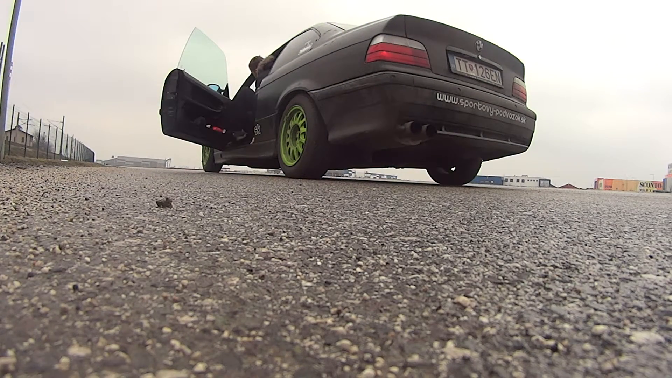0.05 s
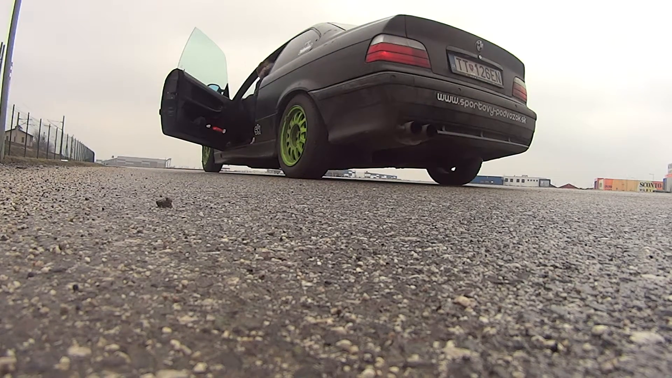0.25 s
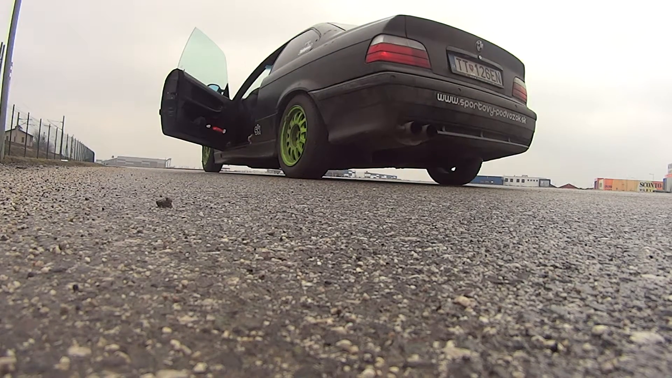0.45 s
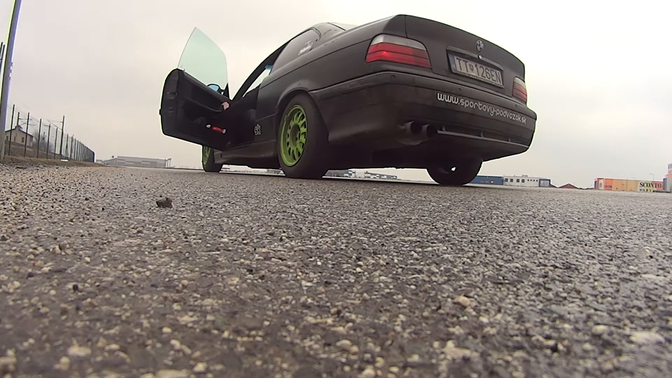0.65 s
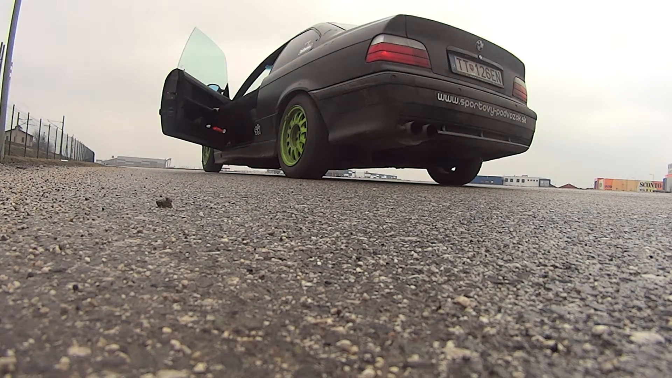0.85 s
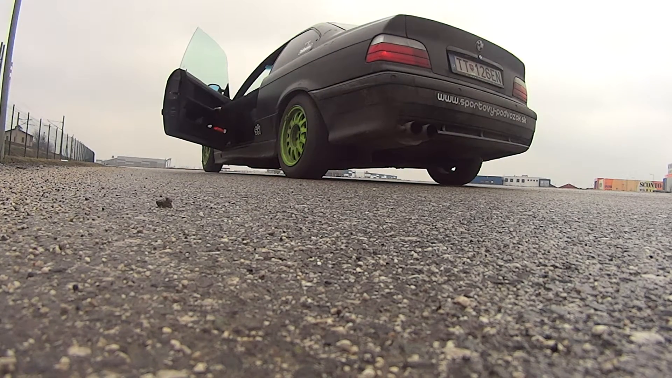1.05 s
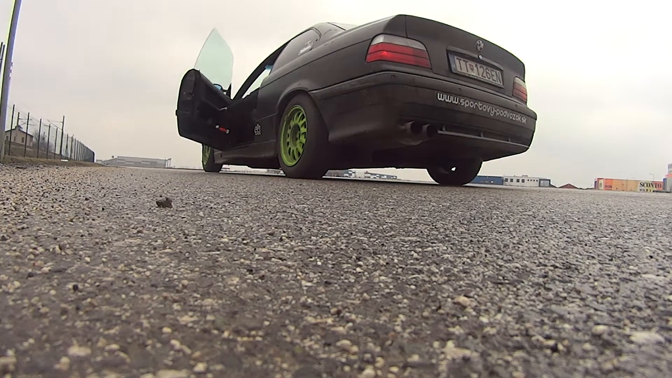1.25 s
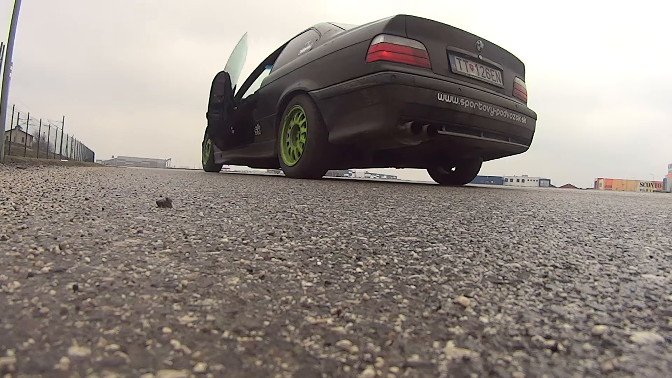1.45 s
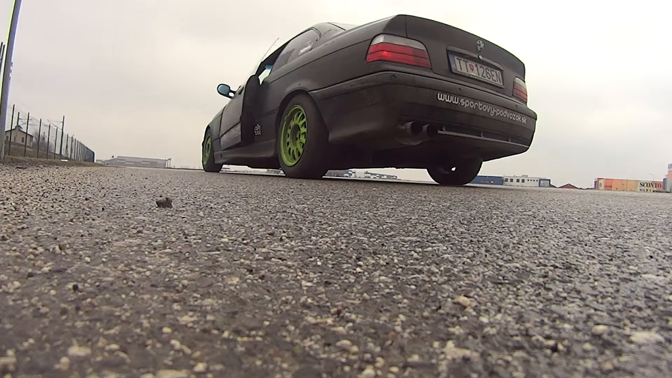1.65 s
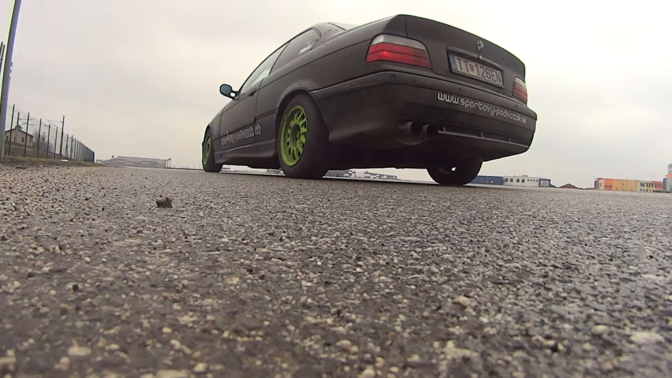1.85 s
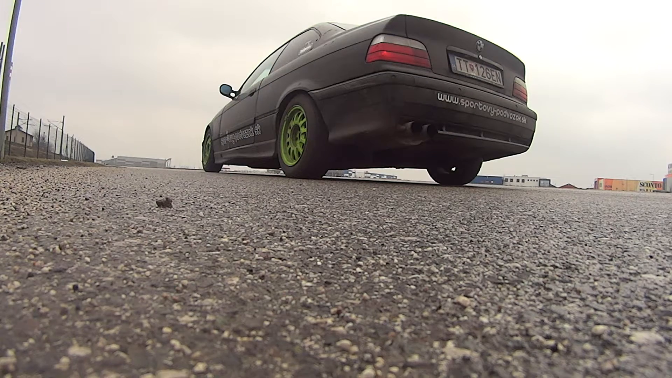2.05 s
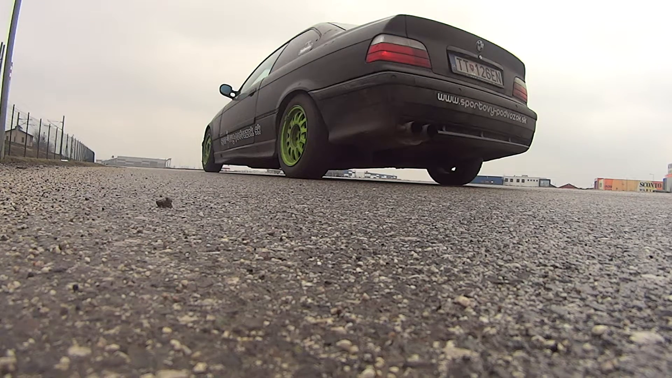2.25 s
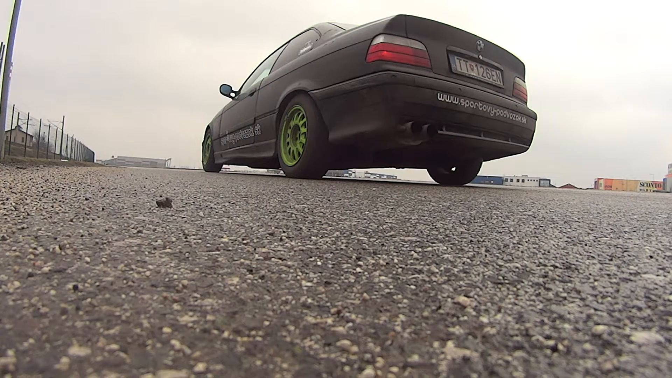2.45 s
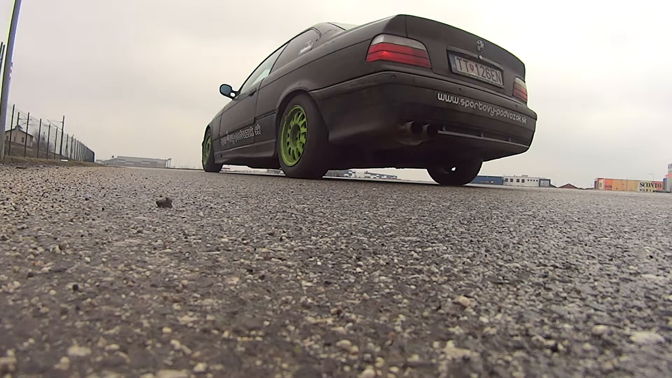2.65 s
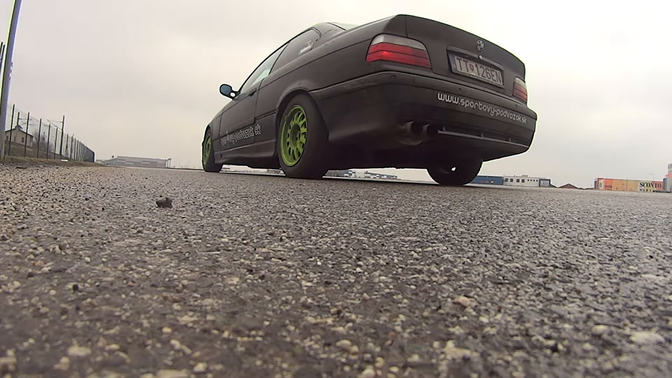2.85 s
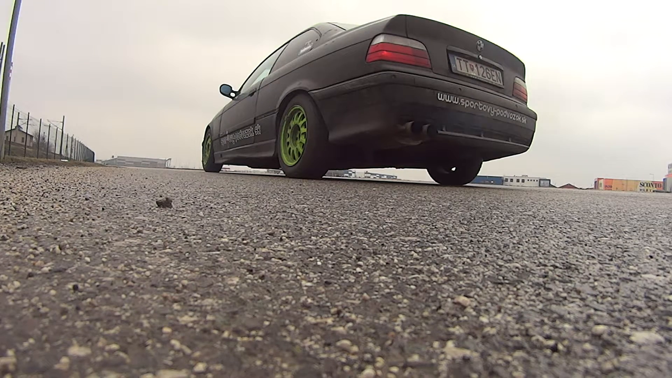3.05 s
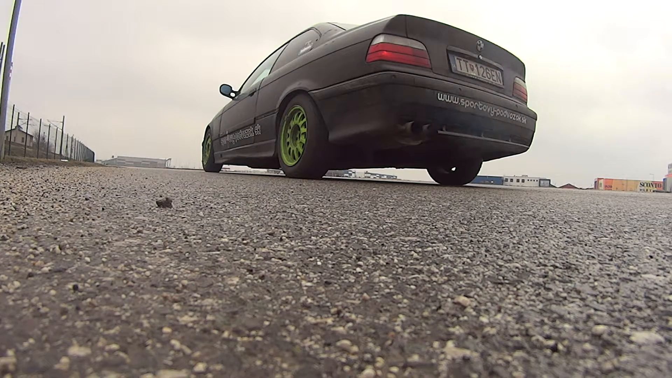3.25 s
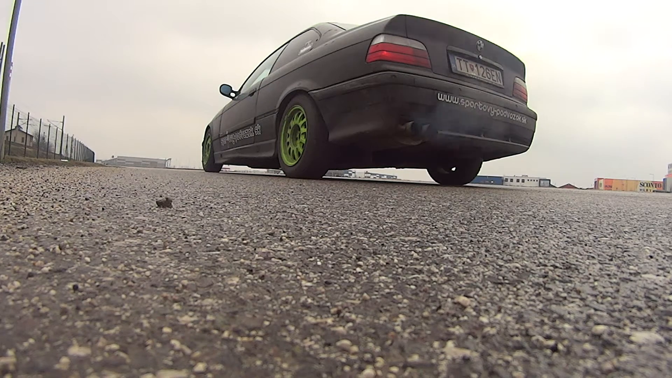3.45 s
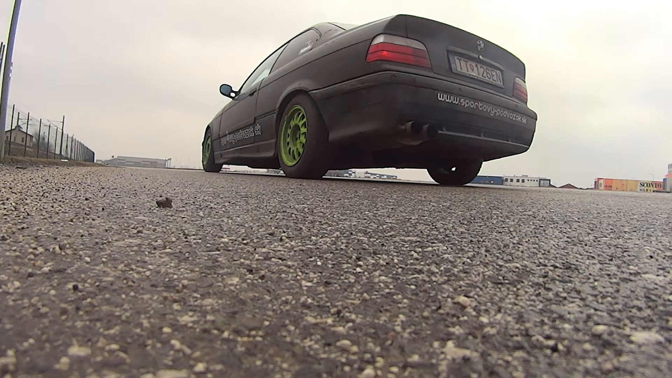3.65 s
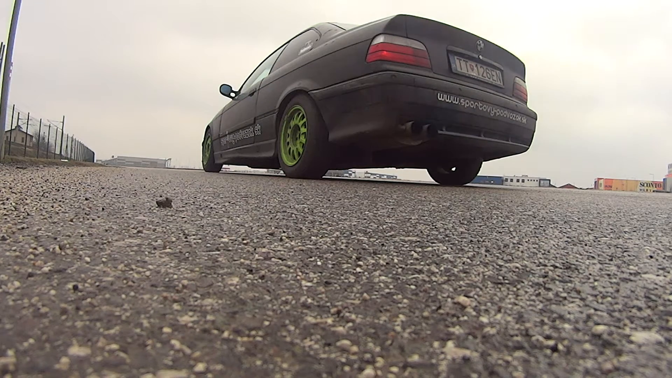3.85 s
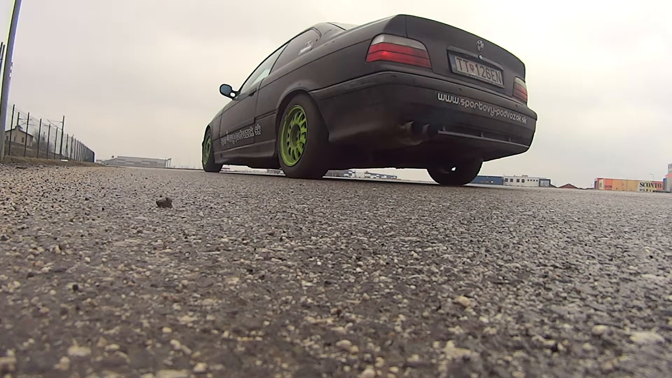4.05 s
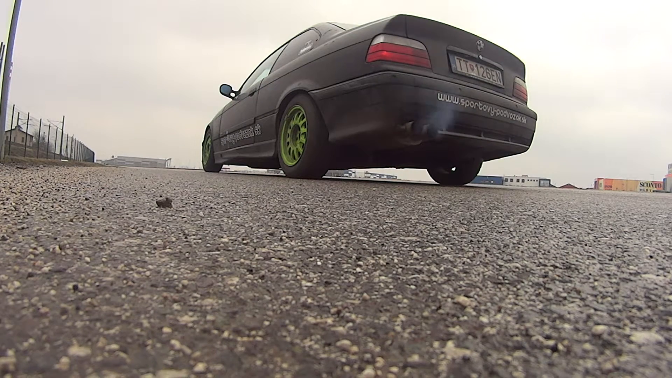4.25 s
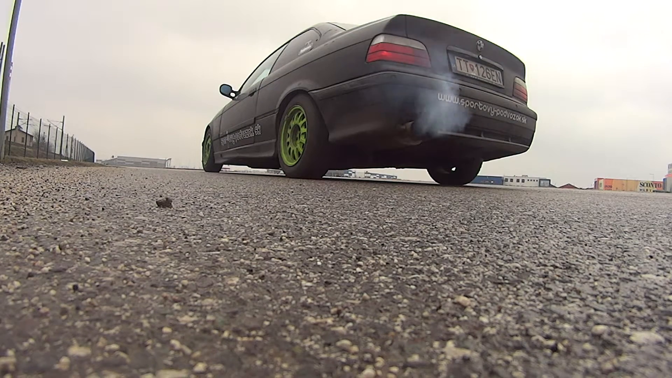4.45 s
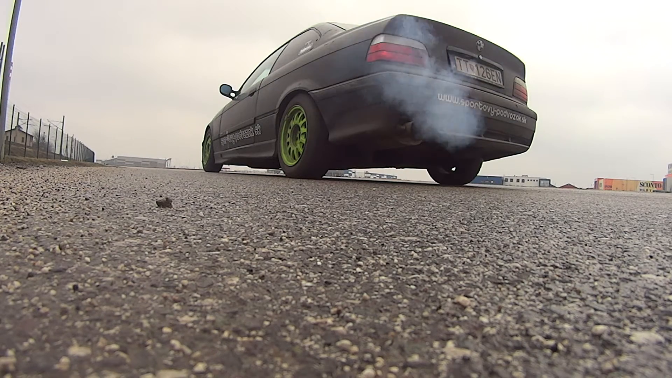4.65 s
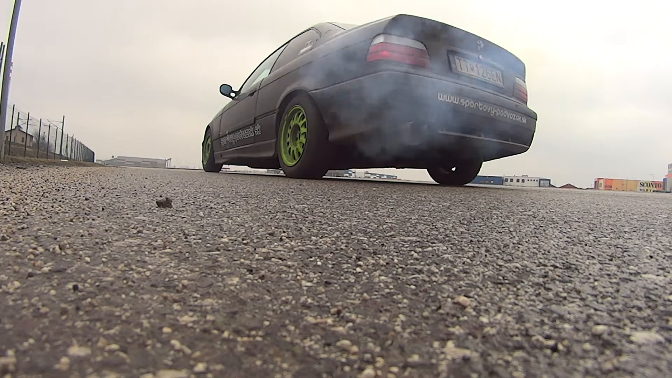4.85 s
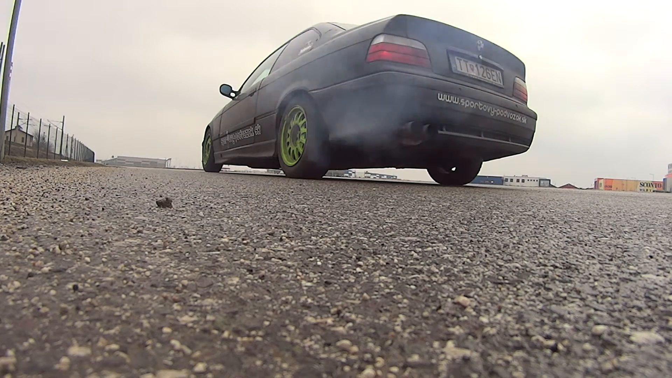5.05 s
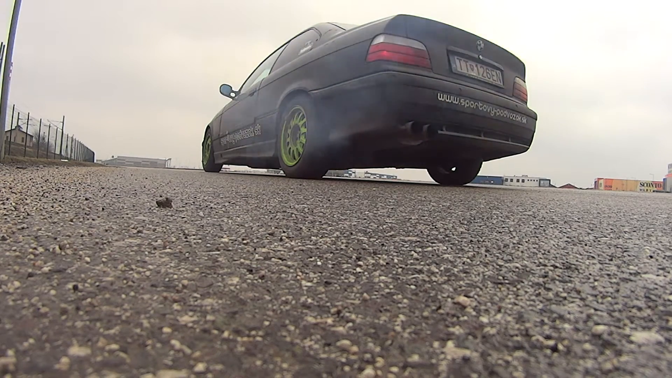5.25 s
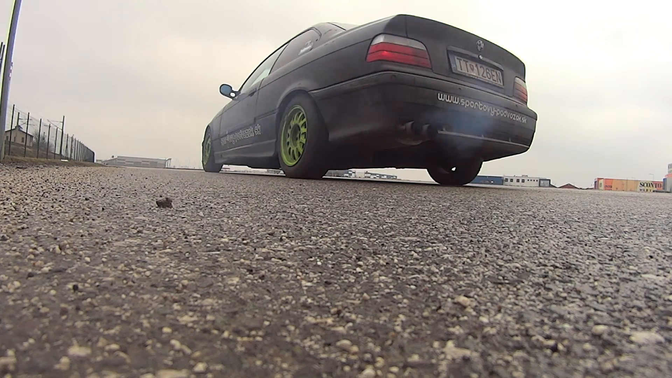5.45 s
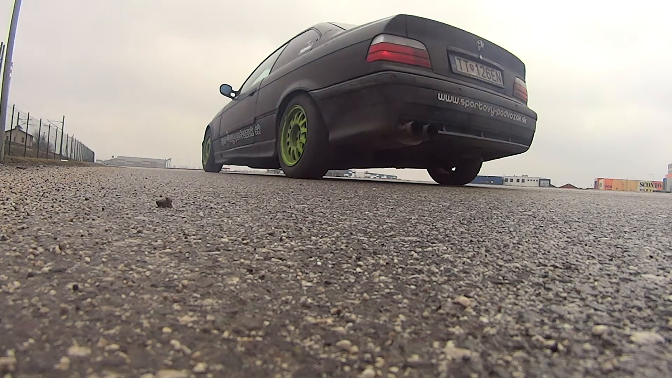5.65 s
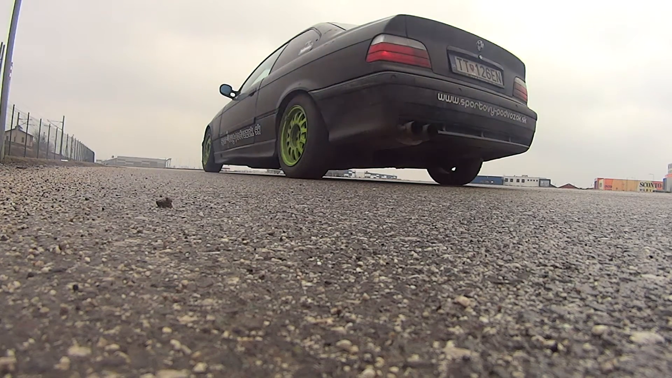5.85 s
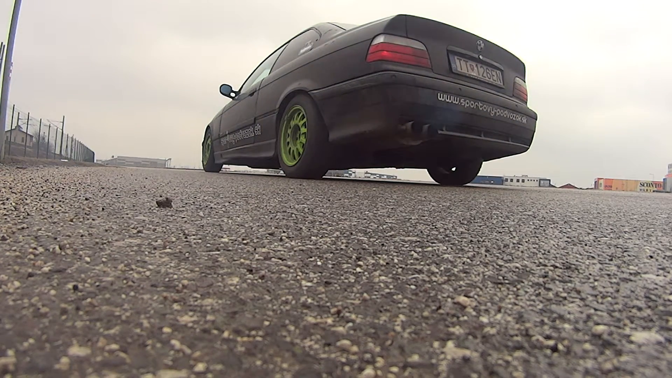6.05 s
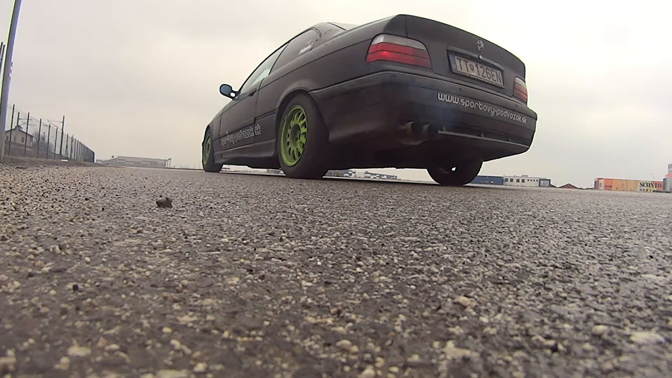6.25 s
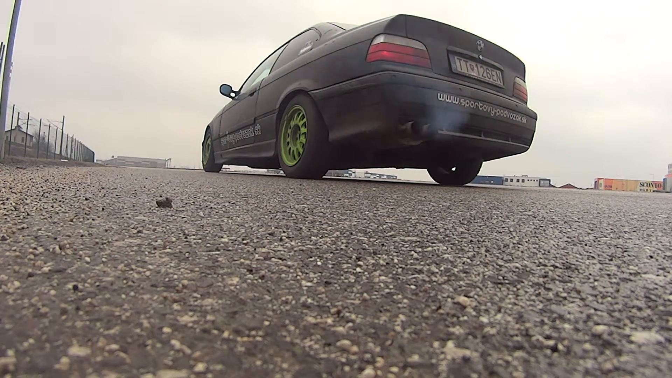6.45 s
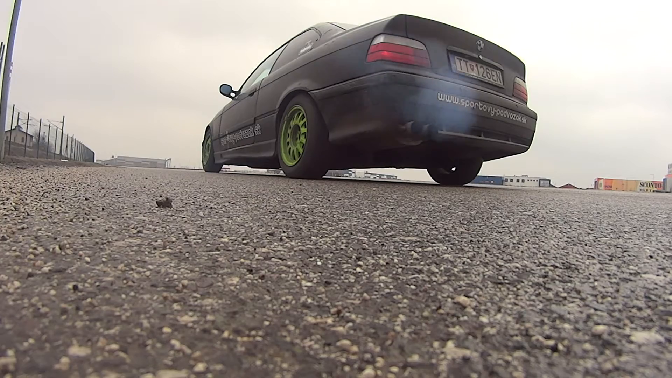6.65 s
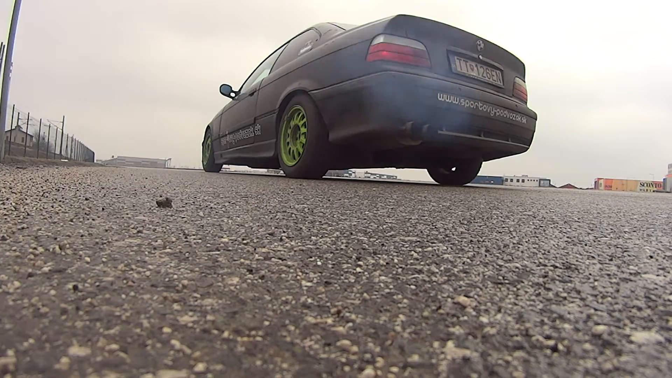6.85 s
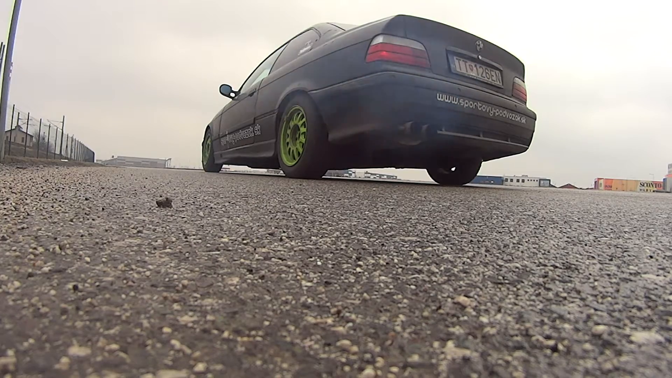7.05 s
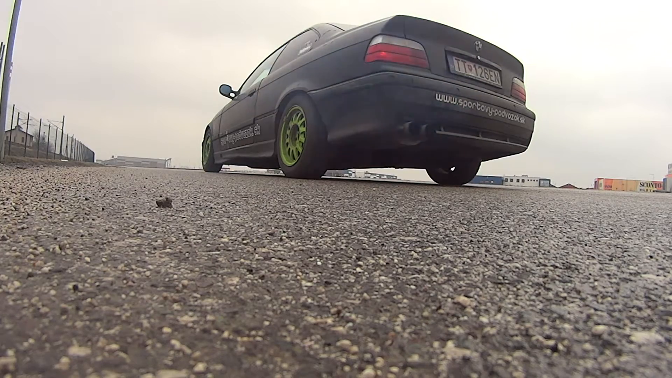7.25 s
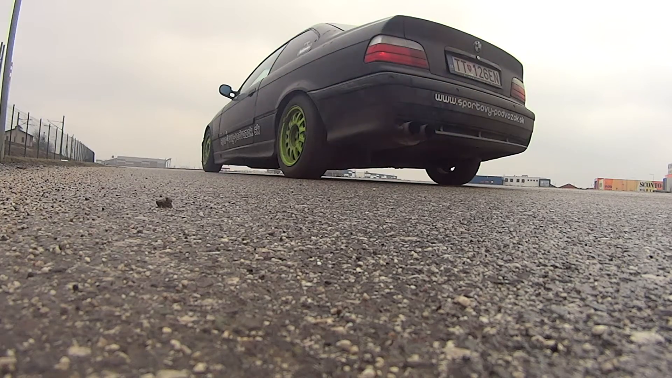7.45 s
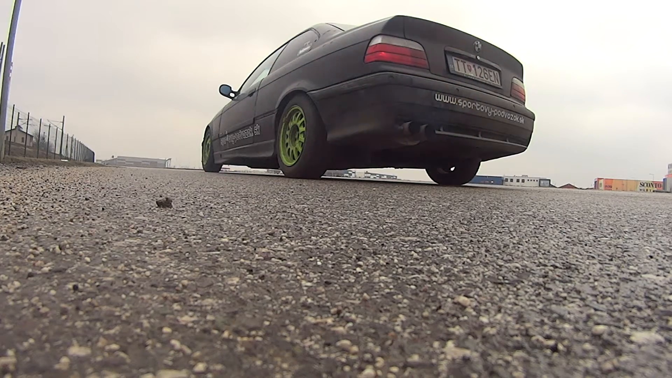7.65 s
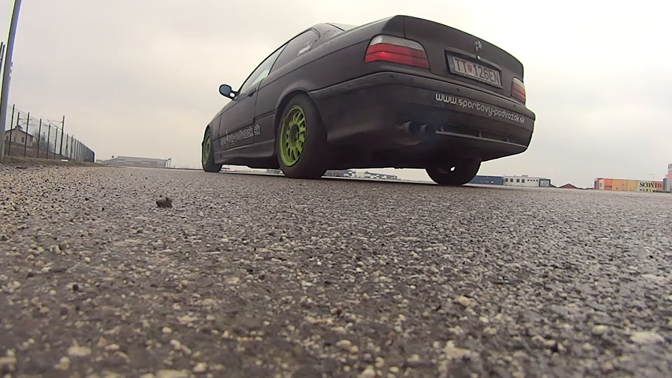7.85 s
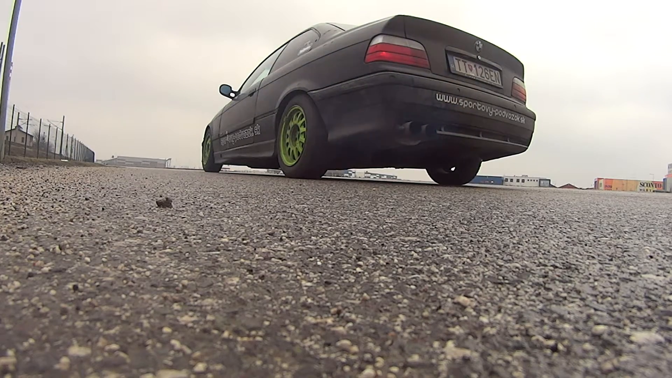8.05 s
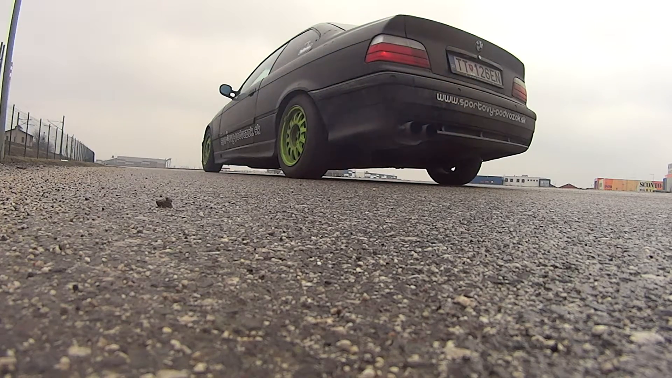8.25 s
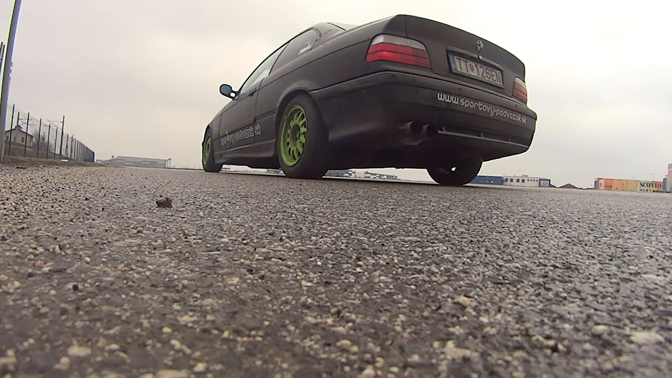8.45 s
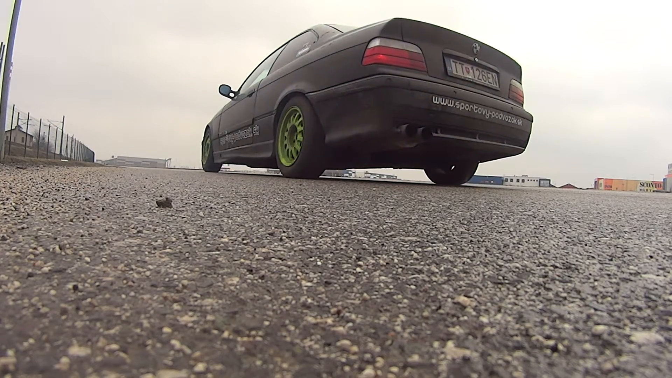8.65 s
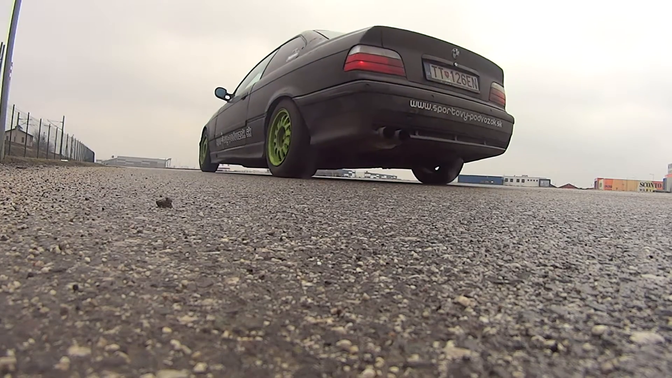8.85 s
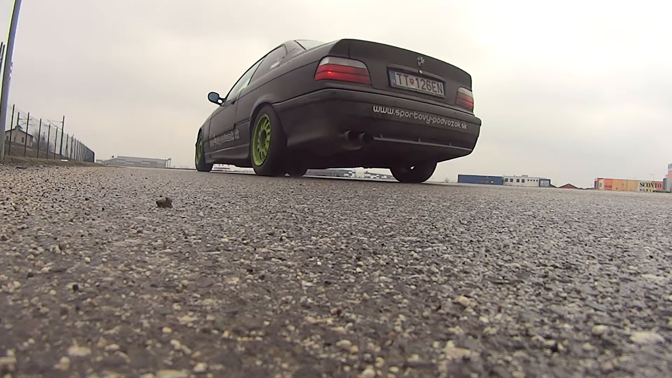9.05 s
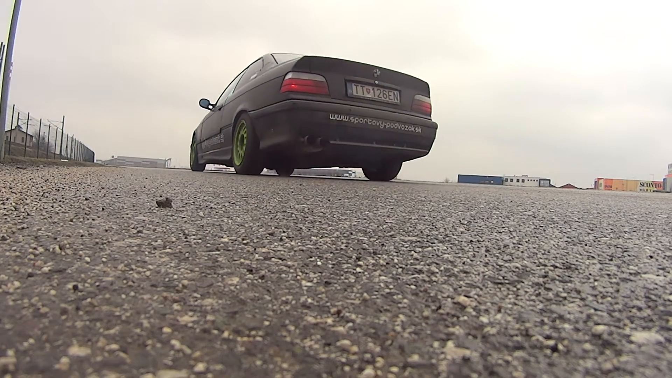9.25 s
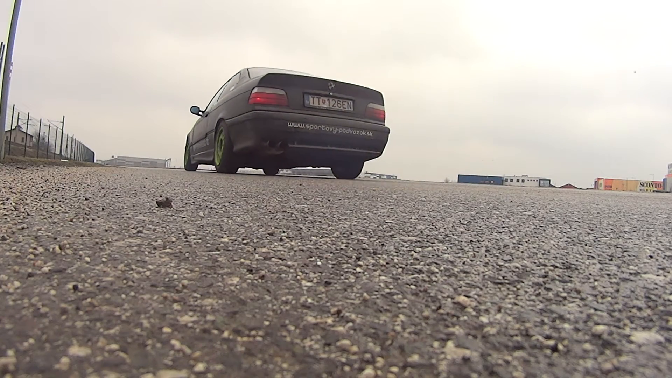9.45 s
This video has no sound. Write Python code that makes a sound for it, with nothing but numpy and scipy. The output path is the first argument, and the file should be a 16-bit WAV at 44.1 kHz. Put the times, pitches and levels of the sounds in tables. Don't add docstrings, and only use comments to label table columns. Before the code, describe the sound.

Low idle and faint valve rustle, then a sharp door slam. The exhaust booms awake and screams through repeated blips, tearing into bright hiss, with dry popping and gunshot-like bangs whenever the pedal lifts. The last snarl drops in pitch to a soft drone before the engine pulls again, barking over scrubbing, stuttering tyre squeals. Close, dry outdoor stereo capture from the ground, slightly overloaded and limited in treble.

```python
import sys
import numpy as np
from scipy import signal
from scipy.fft import rfft, irfft, next_fast_len
from scipy.io import wavfile
from scipy.ndimage import uniform_filter1d

SR = 44100
rng = np.random.default_rng(int(sys.argv[2]) if len(sys.argv) > 2 else 0)


def to_wav(sig):
    pcm = np.clip(np.atleast_2d(sig), -1, 1) * 32767
    pcm = np.round(pcm).astype(np.int16)
    wavfile.write(sys.argv[1], SR, pcm.T)


def undo_db(level):
    steps = np.asarray(level, float) / 20
    return 10 ** steps


N = 419391
T = np.arange(N) / SR

# (frequency [Hz], level [dB])
RASP = [(2180, -40.5), (3700, -4), (4050, -13.5), (5010, 0), (5560, -2), (7190, 4), (8820, -3), (9600, 0),
        (11300, -14), (15000, -16), (22000, -120)]
# (frequency [Hz], level [dB])
TIP = [(3000, -58), (6000, -6), (7300, -3), (8500, -38), (9500, 15), (10500, 1), (11500, -14)]
# (time [s], peak level [dB])
POPS = [(3.169, -6), (3.804, -2), (3.829, 3), (3.909, 5), (5.034, 2), (5.073, -12), (5.0808, -1),
        (5.0821, -2), (5.7137, 4), (5.738, -2), (5.752, 1), (5.761, -5), (5.779, -10), (5.812, 3.5)]
# (time [s], level [dB])
SPIN = [(8.58, -38), (8.63, -29.5), (8.75, -32), (8.83, -41.5), (8.93, -32.5), (9.02, -25), (9.51, -25)]


def read(points, hz):
    f, value = np.transpose(points)
    return np.interp(np.log(hz + 1), np.log(f + 1), value)


def curves(rows):
    s, *columns = np.transpose(rows)
    return [np.interp(T, s, c) for c in columns]


def steady(x, size=2048):
    power = uniform_filter1d(uniform_filter1d(x ** 2, size), size)
    return x / np.sqrt(abs(power) + 1e-20)


def colour(x, points, size=8192):
    db = np.maximum(read(points, abs(np.fft.fftfreq(size, 1 / SR))), -100)
    log_gain = np.log(undo_db(db))
    taps = np.fft.ifft(np.exp(np.conj(signal.hilbert(log_gain)))).real[:size // 2]
    return signal.oaconvolve(x, taps / np.linalg.norm(taps))[:len(x)]


def ring(x, hz, width):
    return signal.lfilter(*signal.iirpeak(hz, hz / width, fs=SR), x)


def resonate(x, hz, width):
    turn = np.exp(2j * np.pi * np.cumsum(hz) / SR)
    r = np.exp(-np.pi * width / SR)
    return 2 * (turn * signal.lfilter([1 - r], [1, -r], x / turn)).real


def trail(shocks, fade_s):
    return signal.lfilter([1], [1, -np.exp(-1 / (fade_s * SR))], shocks)


def shocks_at(events, lift_db):
    shocks = np.zeros(N)
    s, peak_db = np.transpose(events)
    shocks[np.round(s * SR).astype(int)] = undo_db(peak_db + lift_db)
    return shocks


def lines(orders, hz, pipe, wobble_db):
    cycle = 2 * np.pi * np.cumsum(hz) / SR / 6
    t = T[:len(hz):64]
    out = np.zeros(len(hz))
    for k, db in orders:
        swell = np.interp(t, np.linspace(0, T[-1], 200), rng.standard_normal(200))
        gain = undo_db(db + read(pipe, round(k) * hz[::64] / 6) + wobble_db * swell)
        out += np.repeat(gain, 64)[:len(hz)] * np.sin(round(k) * cycle + 7 * rng.random())
    return np.pad(steady(out), (0, N - len(hz)))


def engine():
    hz = revs()
    burn, (boom_db, bark_db, rasp_db, thrum_db) = pedal()
    shut, scatter, steep, bark_snap, rasp_snap = burn
    coasting = np.clip(3 * shut - 1.7, 0, 1)
    puffs, fronts, spits, cracks = firings(hz, shut, scatter, coasting, rasp_db)
    out = boom(puffs, hz, shut, steep, boom_db)
    out += undo_db(thrum_db) * np.sqrt(2) * np.sin(np.pi * np.cumsum(hz) / SR)
    out += colour(cracks, TIP)
    out += bark(fronts, bark_snap, bark_db, coasting)
    out += rasp(spits, rasp_snap, rasp_db, coasting, hz)
    return out + sinking_banks(hz)


def revs():
    # (time [s], firing rate [Hz])
    turns = [(2.326, 67.7), (2.442, 54.4), (2.618, 110.2), (2.868, 133.6), (3.137, 254.3), (3.443, 207.6),
             (3.742, 336.5), (4.721, 198.2), (4.977, 306.8), (5.434, 253.5), (5.681, 334.9), (6.6, 206.2),
             (7.2, 144.0), (7.615, 99.0), (8.58, 174.5), (8.64, 158.2), (9.189, 215.5), (9.51, 203.8)]
    settle_s, flywheel_s = 3.5, .04
    s, hz = np.transpose(turns)
    eased = np.interp(-np.exp(-T / settle_s), -np.exp(-s / settle_s), hz)
    return uniform_filter1d(eased, round(flywheel_s * SR))


def pedal():
    burns = {"idle": (0, .12, .5, .06, .06), "catch": (.1, .28, .6, .6, .6),
             "feather": (.15, .45, .45, .6, .25), "pickup": (.25, .6, .5, .45, .6),
             "rising": (.12, .13, .8, .8, .92), "open": (.06, .09, .8, .93, .78),
             "swell": (.12, .08, .8, .9, .92), "hook": (.1, .06, 1, .68, .9),
             "chatter": (.88, .3, .65, .2, .25), "cut": (.2, 1.6, .7, .35, .3),
             "overrun": (.88, .3, .65, .25, .6), "dying": (.7, .12, .2, .18, .5),
             "grab": (.08, .15, .7, .3, .3), "sink": (.35, .06, .06, .1, .12),
             "coast": (.55, .06, .05, .06, .06), "pull": (.05, .06, .6, .15, .12),
             "slide": (.15, .12, .3, .4, .8), "take": (.05, .08, .5, .08, .08),
             "wake": (.1, .12, .2, .2, .5), "strain": (.15, .06, .35, .15, .15),
             "launch": (.1, .06, 1, .68, .45)}
    loudness = {"idle": (-39.5, -44, -51.5, -70), "catch": (-20.5, -21.5, -22, -45),
                "feather": (-20, -27, -31.5, -44), "pickup": (-28, -23, -26.5, -81),
                "rising": (-32.5, -20.5, -17, -78), "open": (-31, -15.5, -23, -129),
                "swell": (-35, -19.5, -18.5, -68), "hook": (-34, -21.5, -24.5, -59),
                "chatter": (-34, -24, -23.5, -46), "cut": (-33.5, -20, -19.5, -73),
                "overrun": (-34, -21.5, -17.5, -45.5), "dying": (-33.5, -24, -22, -48),
                "grab": (-26, -31.5, -41, -59), "sink": (-29.5, -31, -37.5, -49),
                "coast": (-34.5, -32.5, -35.5, -39.5), "pull": (-25, -33, -39, -45),
                "slide": (-22, -22.5, -28.5, -64), "take": (-27, -35.5, -37.5, -56),
                "wake": (-14.5, -21.5, -19.5, -45), "strain": (-30.5, -32.5, -40, -47),
                "launch": (-33, -19, -25, -62)}
    # (time reached [s], glide [s], state, effort [dB])
    moves = [(0, 0, "idle", 0.5), (2.418, 0.093, "wake", -14.5), (2.462, 0.047, "wake", -3.8),
             (2.51, 0.045, "catch", -0.5), (2.6, 0, "catch", -0.5), (2.74, 0.19, "feather", 0),
             (2.84, 0.027, "feather", 4.5), (2.89, 0.077, "rising", -3), (3.04, 0.044, "swell", -2.4),
             (3.165, 0.032, "cut", -4), (3.23, 0, "chatter", 1), (4.54, 0.13, "dying", -1.5),
             (4.64, 0.067, "sink", 4), (6.46, 0.23, "dying", -1.2), (6.61, 0.19, "sink", 1.8),
             (6.89, 0.3, "coast", -0.3), (7.6, 0.37, "coast", -8), (7.64, 0.084, "take", -5.5),
             (7.98, 0.25, "pull", -0.4), (8.48, 0.5, "strain", 3.5), (8.56, 0.058, "grab", 7.5),
             (8.61, 0.048, "launch", 2), (8.65, 0.04, "hook", 1.8), (9.06, 0.3, "launch", 0),
             (9.4, 0.085, "launch", -4.5), (9.46, 0.17, "launch", -0.5)]
    # (pedal down [s], pedal up [s], misfiring lasts [s], how it picks up, effort [dB])
    stabs = [
        (3.429, 3.728, 0.22, "pickup", -2),
        (4.713, 4.978, 0.15, "slide", -2.05),
        (5.415, 5.683, .17, "pickup", -1.9),
    ]
    stumble_s, bite_s, open_s, lift_s, clear_s = 0.05, 0.053, 0.13, 0.0071, 0.043
    changes = list(moves)
    for down, up, misfire, pickup, db in stabs:
        changes += [(down, stumble_s, pickup, db),
                    (down + bite_s, bite_s, "rising", db),
                    (down + open_s, open_s - bite_s, "open", db),
                    (up + lift_s, lift_s, "cut", db),
                    (up + misfire, clear_s, "overrun", db)]
    rows = [(0, *burns["idle"], *loudness["idle"])]
    for s, glide, state, db in sorted(changes):
        rows.append((max(s - glide, rows[-1][0]), *rows[-1][1:]))
        rows.append((s, *burns[state], *np.add(loudness[state], db)))
    return np.split(np.array(curves(rows)), [5])


def firings(hz, shut, scatter, coasting, rasp_db):
    shares = [0.091, -0.38, 0.32, -0.28, 1, 0.075]
    spit_db = [9, -4, 3, -3, 17, 9]
    # (time [s], delay [ms])
    bank_lag = [(0, .2), (2.85, .2), (3.0, .28), (3.15, .15), (3.42, .15), (3.5, .28), (3.58, .14),
                (4.6, .14), (4.72, .33), (4.8, .28), (4.86, .14), (7.5, .14), (7.7, .07), (8.45, .1),
                (8.7, .45), (9.51, .5)]
    start_turn, blur_s, crack_db, bank_db = .37, 7e-5, -13, -.6
    crackle_below_hz = 244
    turned = np.floor(np.cumsum(hz) / SR + start_turn)
    at = np.flatnonzero(np.diff(turned, prepend=0) > 0)
    luck = np.clip(rng.standard_normal((3, len(at))), -2.5, 1.8)
    cylinder = np.arange(len(at)) % 6

    late = .07 * scatter[at] ** 2 * luck[1] * SR / hz[at]
    at = np.clip(at + np.round(late).astype(int), 0, N - 1)
    lag = cylinder % 2 * curves(bank_lag)[0][at] * SR / 1000
    at = np.minimum(at + np.round(lag).astype(int), N - 1)
    loose = np.clip(at + np.round(blur_s * luck[1] * SR).astype(int), 0, N - 1)

    puffs, fronts, spits, cracks = np.zeros((4, N))
    crack = undo_db(rasp_db[at] + crack_db + 2.5 * luck[0]) * np.sqrt(6 * SR / hz[at])
    cracks[at] = (cylinder == 4) * coasting[at] * crack
    banks = 1 + (.22 + .4 * shut[at]) * np.take(shares, cylinder)
    puffs[loose] = np.exp(-scatter[at] ** 2) * banks + scatter[at] * luck[0]
    front_spread_db = .9 + 3 * shut[at] + 3 * scatter[at]
    fronts[loose] = undo_db(bank_db * (-1.) ** cylinder + front_spread_db * luck[0])
    lead = np.clip(.35 + (crackle_below_hz - hz[at]) / 40, .35, 1)
    spit_spread_db = .8 + 2.5 * shut[at] + 2 * scatter[at]
    spits[at] = undo_db(shut[at] * lead * np.take(spit_db, cylinder) + spit_spread_db * luck[2])
    return puffs, fronts, spits, cracks


def boom(puffs, hz, shut, steep, boom_db):
    # (frequency [Hz], level [dB])
    soft = [(18, -23), (30, -32), (77, 2.5), (151, 5.5), (290, -7.5), (460, -18), (693, -39), (1000, -85),
            (1300, -72), (2200, -120)]
    # (frequency [Hz], level [dB])
    sharp = [(18, -17), (30, -6.5), (122, -11.5), (156, 1), (183, -3.5), (395, -4.5), (461, -9.5),
             (521, -6), (779, -15), (1200, -23), (1560, -71), (2640, -120)]
    # (order [sixths of the firing rate], level [dB])
    overrun = [(3, -25), (4, -12), (5, -9.5), (6, 10), (9, 4), (10, -11.5), (11, -9), (12, -7), (13, -12.5),
               (14, -10), (15, -3), (17, -10), (19, -34), (20, -3.5), (21, -2.5), (22, -15), (23, -21),
               (24, -13), (26, -14), (27, -17), (29, -31), (30, -26), (33, -11), (36, -14), (39, -23)]
    # (order [sixths of the firing rate], level [dB])
    idle = [(4, -25), (6, -10), (8, -17), (10, -30), (12, 0), (16, -20.5), (18, -23), (24, -24),
            (26, -23.5), (28, -23.5), (32, -22)]
    # (frequency [Hz], level [dB])
    shut_pipe = [(40, 3), (85, 10), (150, 9.5), (200, 7.5), (260, -15.5), (450, -1.5), (700, 1),
                 (1400, -13.5)]
    # (frequency [Hz], level [dB])
    rumble = [(12, -38), (20, -8), (48, -39), (86, -53), (134, -32), (225, -7.5), (308, -3.5), (602, -14.5),
              (1000, -22), (1300, -73), (2200, -120)]
    tone = (1 - steep) * steady(colour(puffs, soft)) + steep * steady(colour(puffs, sharp))
    tone = (1 - shut) * steady(tone) + shut * lines(overrun, hz, shut_pipe, wobble_db=2.0)
    idling = np.interp(T, [2.36, 2.41], [1, 0])
    tone = (1 - idling) * steady(tone) + idling * lines(idle, hz[:3 * SR], [(0, 0)], wobble_db=3.0)
    flow = undo_db(-15.9 - 3.7 * idling) * colour(rng.standard_normal(N), rumble)
    return undo_db(boom_db) * (tone + flow)


def blend(shocks, hiss, fade_s):
    gust = steady(trail(shocks, fade_s))
    blurred = steady(shocks) + .25 * steady(trail(shocks, .0004) * hiss)
    return blurred, gust


def jet_of(blurred, gust, hiss, snap, depth):
    return snap * steady(blurred) + np.sqrt(1 - snap ** 2) * steady((1 + depth * snap * gust) * hiss)


def darken(sound, coasting):
    dark_db, dark_hz = -4.5, 1880
    low = signal.sosfiltfilt(signal.butter(2, dark_hz, fs=SR, output="sos"), sound)
    return sound - (1 - undo_db(dark_db * coasting)) * low


def bark(fronts, snap, bark_db, coasting):
    # (frequency [Hz], level [dB])
    comb = [(350, -29.5), (600, -11.5), (751, -10.5), (831, -7), (1030, -4), (1340, -3.5), (1550, -1),
            (1860, -10), (2110, 0), (2600, 3), (3370, -6.5), (3980, -9), (4400, -5.5), (5720, -8.5),
            (9680, -120)]
    # (frequency [Hz], level [dB])
    blare = [(800, -24.5), (1800, -16), (2150, 0.5), (2600, 0.5), (3200, -6), (3800, -7), (6000, -61)]
    blare_db, notch_hz = 3, 1850
    hiss = rng.standard_normal(N)
    hiss = signal.sosfilt(signal.butter(3, 1100, "high", fs=SR, output="sos"), hiss)
    blurred, gust = blend(fronts, hiss, .003)
    below = signal.butter(4, notch_hz, fs=SR, output="sos")
    for _ in range(2):
        blurred = 2 * signal.sosfiltfilt(below, blurred) - blurred
    sound = steady(colour(jet_of(blurred, gust, hiss, snap, 1.5), comb))
    full = np.clip(8 * snap - 6.3, 0, 1)
    return undo_db(bark_db) * darken(sound, coasting) - undo_db(bark_db + blare_db) * full * steady(colour(fronts, blare))


def rasp(spits, snap, rasp_db, coasting, hz):
    # (frequency [Hz], width [Hz], share needing the howl, over rasp [dB])
    lip_rings = [
        (7180, 530, 1.0, -11),
        (6470, 890, 1.0, -10),
        (2575, 120, 0.34, -11),
        (4900, 500, 0.1, -17.5),
    ]
    howl_at_hz, howl_span_hz = 263, 20.7
    snap_at_hz, snap_span_hz, snap_hz, snap_db = 229, 6.6, 7900, -7.5
    zing_hz, zing_width_hz, zing_db = 7400, 650, -10
    drift_db = 4
    hiss = rng.standard_normal(N)
    blurred, gust = blend(spits, hiss, .0025)
    jet = jet_of(blurred, gust, hiss, snap, 2.5)
    out = undo_db(rasp_db) * darken(steady(colour(jet, RASP)), coasting)

    snapping = coasting * np.exp(-((hz - snap_at_hz) / snap_span_hz) ** 2)
    out += undo_db(rasp_db + snap_db) * snapping * steady(ring(ring(spits, snap_hz, 1600), snap_hz, 3300))
    zinging = np.clip(10 * snap - 8.2, 0, 1)
    out += undo_db(rasp_db + zing_db) * zinging * steady(ring(spits, zing_hz, zing_width_hz))

    howl = np.exp(-((hz - howl_at_hz) / howl_span_hz) ** 2)
    for f, width, share, db in lip_rings:
        drift = np.interp(T, np.linspace(0, T[-1], 150), rng.standard_normal(150))
        gain = undo_db(rasp_db + db + drift_db * drift) * coasting * (1 - share + share * howl)
        out += gain * steady(ring(ring(jet, f, width), f, 2 * width))
    return out


def sinking_banks(hz):
    # (order [sixths of the firing rate], level [dB])
    half_orders = [(9, 4), (15, 0.5), (21, -2), (27, -6)]
    # (time [s], level [dB])
    fall = [
        (6.5, -59),
        (6.6, -36.5),
        (6.95, -43),
        (7.25, -52),
        (7.5, -74),
    ]
    return undo_db(curves(fall)[0]) * lines(half_orders, hz, [(0, 0)], wobble_db=0.5)


def stalls():
    # (time [s], half length [s], level [dB])
    lulls = [(3.773, .004, 1), (3.901, 0.0042, -5), (5.063, 0.0054, 0), (5.715, 0.0032, -7),
             (5.733, 0.0036, -2), (5.77, 0.014, -1.5), (5.821, .004, 0.5)]
    gulp_db, gulp_s = -5, 0.011
    t = T[::16]
    gulps = sum(gulp_db * np.exp(-((t - s + 0.46 * gulp_s) / gulp_s) ** 2) for s, _ in POPS)
    gulps = np.maximum(gulps, gulp_db)
    pauses = sum(db * np.exp(-((t - s) / half) ** 4) for s, half, db in lulls)
    return np.interp(T, t, undo_db(gulps + pauses))


def backfires():
    # (first [s], every [s], count, peak level [dB], change a spit [dB])
    lone_spits = [
        (4.5271, .0283, 6, -3, -1.8),
        (6.4351, .0275, 6, -5, -.3),
    ]
    # (time [s], peak level [dB])
    ticks = [(3.1562, -6), (3.1827, -8), (3.1914, -2), (3.1944, 0), (3.1994, -11), (3.2034, -14),
             (3.2246, -11), (3.2284, -9), (3.2334, -13), (3.2454, -18), (3.3114, -11), (3.3194, -15),
             (3.3458, -13), (3.3732, -17), (3.402, 0), (3.4276, -10), (4.708, -8), (4.7275, 0), (5.0, -13),
             (5.0174, 2), (5.0234, 1), (5.0304, -2), (5.0404, -2), (5.057, 5), (5.0884, -14), (5.1064, -2),
             (5.1104, 1), (5.1754, -6), (5.4226, 0)]
    # (time [s], peak level [dB])
    thumps = [(3.171, -14), (3.195, -16), (3.405, -9), (5.372, -13.5), (5.41, -23), (7.622, -20),
              (7.92, -14), (8.225, -16), (8.262, -15)]
    # (frequency [Hz], level [dB])
    pop_shape = [(60, -14), (200, -6), (900, -1), (2500, 0), (7000, -3), (11000, -8)]
    # (frequency [Hz], level [dB])
    thump_shape = [(60, -14), (150, 8), (300, -3), (800, -5), (1200, -21), (3000, -42)]
    spits = []
    for s, every, count, db, step_db in lone_spits:
        spits += [(s + k * every, db + k * step_db) for k in range(count)]
    out = colour(shocks_at(POPS, 8), pop_shape)
    out += colour(shocks_at(spits, 6), RASP)
    out += colour(shocks_at(ticks, 4), RASP)
    return out + colour(shocks_at(thumps, 12), thump_shape)


def crackle():
    # (time [s], peak
    # level [dB])
    crackles = [(3.7424, -13), (3.756, -11), (3.7674, -10), (3.781, -10), (3.7864, -13), (3.7899, -18),
                (3.7964, -11), (3.8114, -11), (3.816, -10), (3.823, -8), (3.8279, -14), (3.8564, -10),
                (3.8624, -14), (3.881, -10), (3.8944, -7), (3.9024, -5), (5.1345, -12), (5.1382, -16),
                (5.1474, -14), (5.1564, -10), (5.1804, -17), (5.185, -17), (5.695, -13), (5.7032, -12),
                (5.7093, -14), (5.7229, -11), (5.7318, -10), (5.7377, -9), (5.7431, -8), (5.753, -15),
                (5.76, -11), (5.7655, -13), (5.771, -14), (5.7797, -8), (5.7895, -5), (5.8018, -12),
                (5.8165, -12), (5.8338, -15), (5.8439, -13), (8.572, -20), (8.5824, -13)]
    # (time [s], peak level [dB])
    fizzes = [(3.8417, -9), (3.8684, -20), (3.8754, -21), (3.9235, -10), (3.9519, -17), (3.958, -17),
              (4.0066, -14), (4.0204, -15), (4.0277, -18), (5.0878, -13), (5.1214, -19), (5.1627, -15),
              (5.1774, -16), (5.1981, -13), (5.7882, -17), (5.8018, -15), (5.8516, -26), (5.852, -16),
              (5.8721, -14), (5.8788, -13), (5.8984, -16)]
    # (time [s], peak level [dB])
    chatter = [(2.5177, -13), (2.5314, -19), (2.5435, -14), (2.8374, -17), (3.1562, -10), (3.1684, -16),
               (3.2034, -13), (3.2246, -12), (3.2284, -12), (3.2334, -13), (3.25, -11), (3.2544, -13),
               (3.2595, -13), (3.2755, -11), (3.2804, -13), (3.285, -14), (3.2934, -13), (3.3114, -13),
               (3.3195, -13), (3.3374, -15), (3.3463, -12), (3.3732, -16), (3.4012, -14), (3.4214, -25),
               (3.428, -13), (3.4334, -19), (3.4384, -21), (3.4506, -14)]
    # (frequency [Hz], level [dB])
    dry_shape = [(3500, -40), (5500, -11), (7300, -10), (8600, -5), (9500, 3), (10500, -11), (11500, -12)]
    fizz_s, fizz_db = 0.0018, -13.5
    out = np.zeros(N)
    for events, shape, lift_db in ((crackles, RASP, 9), (fizzes, TIP, 13), (chatter, dry_shape, 11)):
        shocks = shocks_at(events, lift_db)
        wisp = trail(shocks, fizz_s) * rng.standard_normal(N)
        out += colour(shocks + undo_db(fizz_db) * wisp, shape)
    return out


def tyres():
    level, singing, hz = chirping()
    noise = rng.standard_normal((3, N))
    waver = 1 + 0.021 * steady(uniform_filter1d(noise[0], 300), size=8192)
    whistle = np.sqrt(2) * np.sin(2 * np.pi * np.cumsum(hz * waver) / SR)
    flutter = undo_db(4.4 * steady(uniform_filter1d(noise[1], 200)))
    other = steady(resonate(resonate(noise[1], hz * 1.4, 160), hz * 1.35, 160))
    scrub = steady(resonate(resonate(noise[2], hz * 1.12, 1000), hz * 1.1, 1160))
    start = np.clip((T - SPIN[0][0]) / 0.02, 0, 1)
    squeal = undo_db(-0.3) * level * singing * whistle * flutter
    return start * (squeal + undo_db(curves(SPIN)[0]) * (undo_db(-8) * other + undo_db(6.0) * scrub))


def chirping():
    # (time [s], peak level [dB], squeal pitch [Hz], length [s])
    chirps = [(8.602, -25, 2300, .012), (8.735, -27, 1650, .012), (8.8, -22, 1800, .008),
              (8.894, -20, 1860, .016), (8.978, -20, 1855, .013), (9.047, -21, 1880, .02),
              (9.094, -26, 1750, .015), (9.128, -22, 1940, .022), (9.206, -23, 1890, .02),
              (9.3, -19, 1790, .012), (9.357, -23, 1965, .025), (9.412, -21, 1850, .026),
              (9.478, -24, 1950, .028)]
    spin_hz, arch = 1645, 0.082
    s, db, hz, length = np.transpose(chirps)[:, :, None]
    away = ((T - s) / length) ** 2
    spin = undo_db(curves(SPIN)[0]) ** 2
    slips = undo_db(db) ** 2 * np.exp(-away)
    power = spin + slips.sum(axis=0)
    arched_hz = hz * (1 - arch * np.minimum(away, 2) * (s < 9.25))
    pitch = (spin * spin_hz / 20 + (slips * arched_hz).sum(axis=0)) / (power - spin + spin / 20)
    return np.sqrt(power), np.sqrt(1 - spin / power), pitch


def door():
    # (time [s], peak level [dB], 60 dB decay [s])
    slams = [
        (1.779, -7, 0.096),
        (1.795, -6, 0.068),
        (1.82, -20, 0.082),
        (1.855, -34, 0.09),
        (1.904, -33, 0.12),
    ]
    # (time [s], pitch [Hz], level [dB], 60 dB decay [s])
    knocks = [
        (2.3, 80, -29, .12),
        (1.782, 590, -25, 0.027),
        (1.8545, 2900, -22, 0.016),
        (1.7, 2300, -27, .014),
        (1.9, 2350, -40, 0.019),
    ]
    # (frequency [Hz], level [dB])
    panel = [(35, -49), (60, -22), (151, -8), (278, -30), (339, -33), (1260, -1.5), (2040, -5.5), (2550, 2),
             (3860, -9), (5250, -2), (8690, -21), (9480, -13), (11300, -35), (14700, -65), (22000, -120)]

    def dying(s, db, t60):
        return undo_db(db - 60 * np.maximum(T - s, 0) / t60) * (T >= s)

    force = sum(dying(s, db, t60) for s, db, t60 in slams)
    rings = sum(dying(s, db, t60) * np.sin(2 * np.pi * hz * (T - s)) for s, hz, db, t60 in knocks)
    return undo_db(-7.5) * colour(force * rng.standard_normal(N), panel) + rings


def valves():
    # (frequency [Hz], width [Hz], level [dB])
    covers = [(1062, 18, -58.5), (1175, 65, -57.5), (1485, 95, -55.5), (1732, 23, -59.5), (2200, 210, -56),
              (4870, 240, -53), (6140, 130, -56)]
    beat, rise_db = 0.08, 5
    hz = revs()
    throb = 1 + beat * np.sin(2 * np.pi * np.cumsum(hz) / SR / 6)
    rustle = throb * rng.standard_normal(N)
    out = sum(undo_db(db) * steady(ring(rustle, f, w), size=8192) for f, w, db in covers)
    return undo_db(rise_db * np.log2(hz / hz[0])) * out


def scene():
    near = engine() * stalls() + backfires() + crackle() + tyres() + door() + valves()
    scatter = rng.standard_normal(3000) * undo_db(-60 * np.arange(3000) / SR / 0.05)
    scatter = signal.sosfilt(signal.butter(1, 300, "high", fs=SR, output="sos"), scatter)
    apart = undo_db(-11.0) * signal.oaconvolve(near, scatter / np.linalg.norm(scatter))[:N]
    return np.array([near + apart, near - apart])


def low_pass(x):
    return signal.sosfilt(signal.butter(12, 12310, fs=SR, output="sos"), x)


def record(dry):
    # (frequency [Hz], level [dB])
    left_db = [(60, 1.0), (97, 2.0), (160, 4.5), (250, 8.0), (410, 14.0), (660, 3.5), (1070, -3.0),
               (1720, -1.0), (2780, 0.5), (4490, 0.0), (7250, -2.0), (11700, -1.5)]
    # (frequency [Hz], phase [radians])
    lead = [(0, .5), (125, .8), (340, 1.3), (600, 4.8), (950, 6.9), (1640, 6.5), (1890, 7.1), (4050, 6.6),
            (7000, 6.2), (11000, 6.3)]
    # (frequency [Hz], level [dB])
    cavity = [(8300, 0), (8850, -3), (9400, -0.5), (10200, -2), (10650, -5.5), (10980, 6.5), (11100, -1.5)]
    edge_hz, capsule_hz, splatter_db = 11070, 90, -11
    size = next_fast_len(N + 8192)
    hz = np.fft.rfftfreq(size, 1 / SR)
    right = undo_db(-read(left_db, hz)) * np.exp(-1j * read(lead, hz))
    ports = np.array([np.ones_like(right), right]) * 2 / (1 + right)
    dry = 0.73 * np.tanh(dry / 0.9)
    edge = 1 / (1 + (hz / edge_hz) ** 240) + undo_db(-30) / (1 + (hz / edge_hz) ** 70)
    edge = edge * undo_db(read(cavity, hz))
    edge = edge / np.sqrt(1 + (42 / (hz + 1)) ** 4)
    edge = edge * (1j * hz - capsule_hz) / (1j * hz + capsule_hz)
    heard = irfft(rfft(dry, size) * ports * edge, size)[:, :N]
    heard = heard - undo_db(splatter_db) * np.gradient(heard, axis=1) ** 3
    return low_pass(heard)


dry = scene()
out = record(dry)
to_wav(out)
```